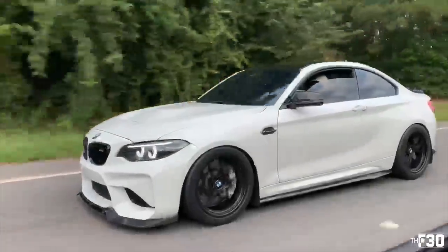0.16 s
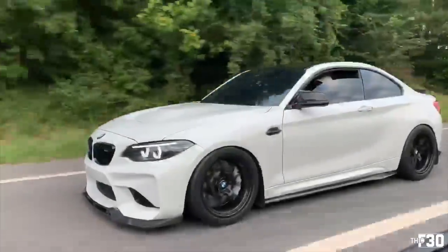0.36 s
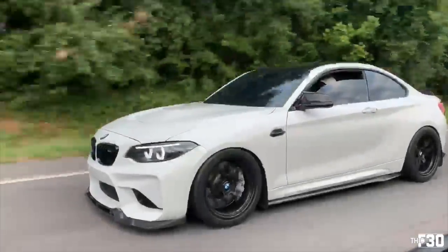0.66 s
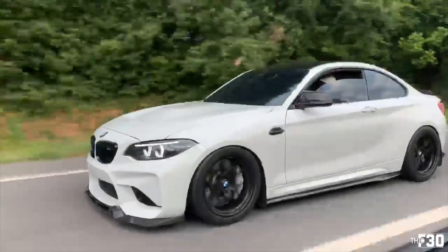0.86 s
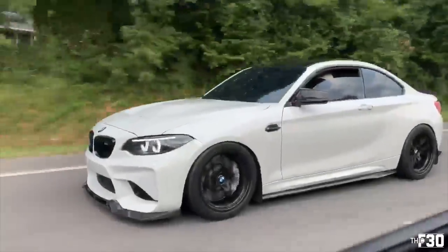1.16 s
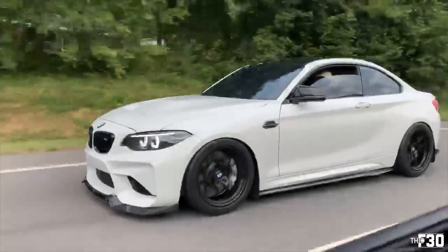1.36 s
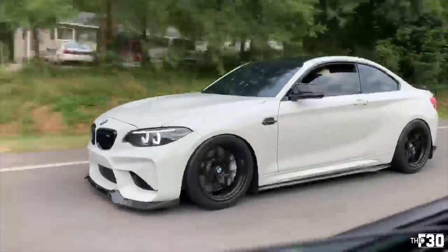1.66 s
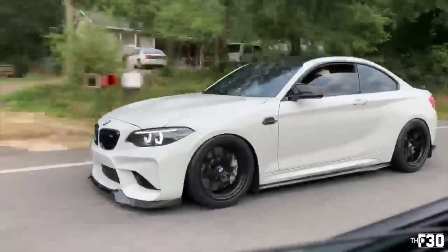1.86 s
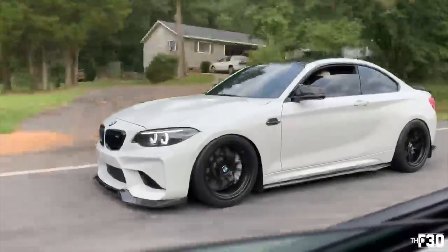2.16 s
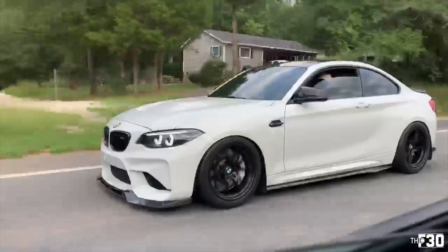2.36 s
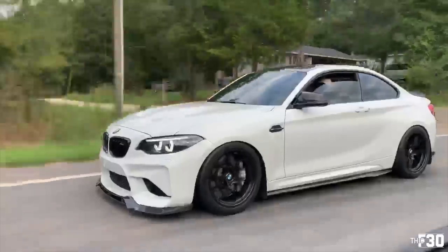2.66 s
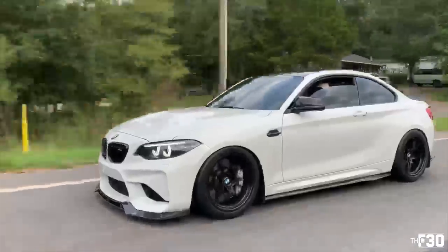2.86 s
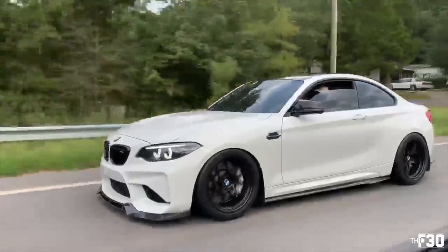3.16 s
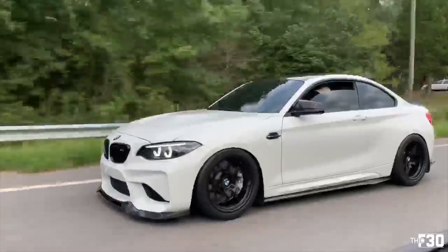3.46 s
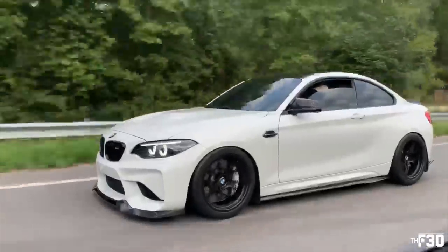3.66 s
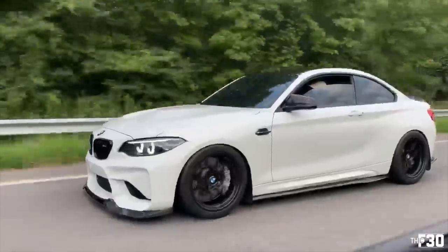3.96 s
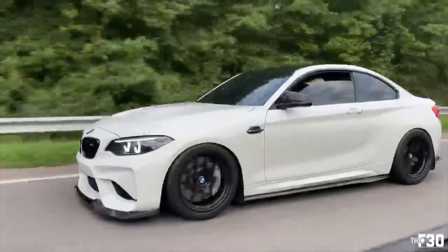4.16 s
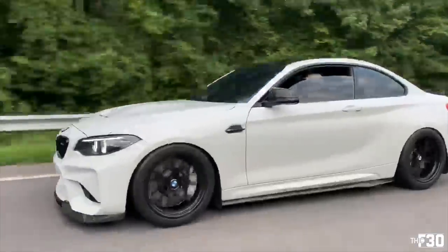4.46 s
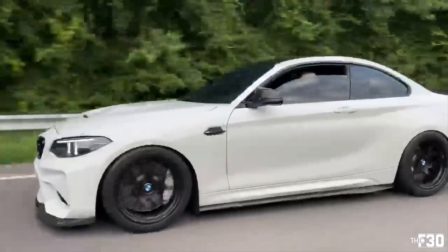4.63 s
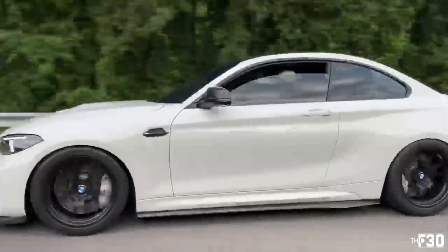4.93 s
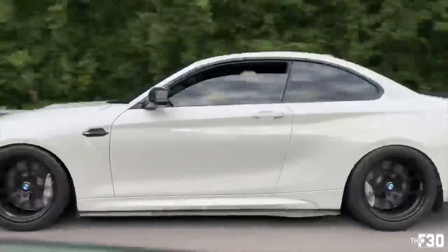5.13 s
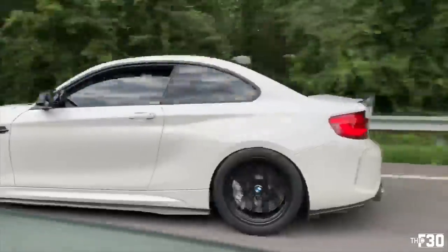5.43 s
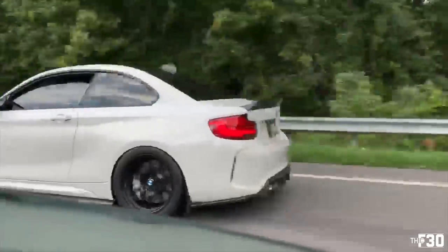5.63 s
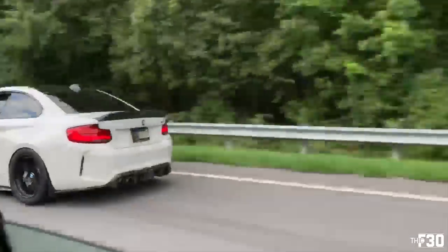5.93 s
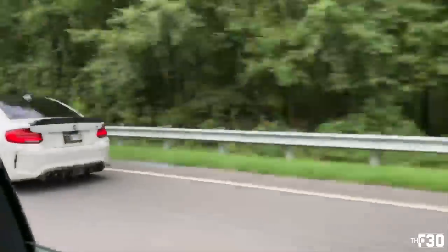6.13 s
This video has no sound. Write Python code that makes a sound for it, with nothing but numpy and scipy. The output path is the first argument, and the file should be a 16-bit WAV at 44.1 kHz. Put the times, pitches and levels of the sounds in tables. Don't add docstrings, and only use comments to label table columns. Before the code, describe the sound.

Inside a car on a tree-lined road, steady tyre roar and low cabin boom surround a small stereo microphone. A turbo coupe alongside pops and burbles irregularly, densest just before three seconds. Then misfires stutter, a thin turbo whistle rises, and the six-cylinder note grows loud and raspy, climbing as the car passes ahead with rushing exhaust gas and hard snaps at the end.

```python
import sys
import numpy as np
from scipy import signal
from scipy.fft import rfft, irfft
from scipy.io import wavfile

SR = 44100
rng = np.random.default_rng(int(sys.argv[2]) if len(sys.argv) > 2 else 0)


def nominal_scale(level):
    x = np.asarray(level, float) / 20
    return 10 ** x


def inscribe(sig):
    pcm = np.round(np.clip(np.atleast_2d(sig).T, -1, 1) * 32767)
    wavfile.write(sys.argv[1], SR, pcm.astype(np.int16))


N = 277509

# start_s, boom_hz, boom_db, buffeting_db
CABIN_BOOM = [
    (0.0, 64.94, -25, -22),
    (1.1, 64.5, -27.5, -19),
    (1.7, 65.17, -21, -22.5),
    (2.4, 64.2, -19, -19.5),
    (4.1, 64.2, -21, -19.5),
    (4.66, 65.6, -28, -14),
    (5.0, 69.15, -21, -24.5),
    (5.6, 70.1, -27.5, -34),
    (6.29, 72.6, -45, -28),
]
# pitch_hz, level_db (per Hz)
BUFFETING_COLOUR = [(11, -31), (18, 9.5), (43, 0), (65, 5.5), (85, -2), (140, -7), (220, -14.5), (290, -14),
                    (480, -120)]
# start_s, level_db
TYRE_ROAR = [
    (0.0, -30),
    (1.6, -29),
    (2.7, -27),
    (4.0, -25),
    (4.2, -25),
]
# pitch_hz, level_db (per Hz)
TYRE_COLOUR = [(76, -25), (130, 2), (181, -12), (236, -14.5), (377, -4), (550, -9.5), (623, -13),
               (813, -10), (966, -2.5), (1280, -13), (1520, -10), (2000, -19.5), (2380, -19), (2750, -30),
               (5500, -46), (7150, -91), (12100, -120)]
# start_s, level_db
WIND_GUSTS = [(0.0, -55.5), (1.1, -58), (1.37, -52.5), (2.26, -55), (2.87, -49.5), (3.35, -52.5),
              (4.2, -48), (4.66, -39), (4.9, -37.5), (5.43, -40.5), (5.83, -33), (6.01, -37), (6.29, -63)]
# pitch_hz, level_db (per Hz)
WIND_COLOUR = [(3500, 8.5), (5000, -7.5), (7000, -1.5), (9000, -17), (11000, 30), (13000, -12),
               (15000, -2.5), (16500, -5.5)]
# pitch_hz, level_db
CRUISE_TONES = [(193, -39), (228, -36), (288, -40), (322, -43), (581, -54), (840, -50), (931, -51),
                (1265, -55)]
# start_s, pitch_hz, start_level_db, swell_db_per_s
PIPE_DRONES = [
    (5.2, 655, -30, 7.5),
    (5.82, 620, -21, -1),
    (5.8, 307, -31, 8),
    (5.3, 722, -30, 0),
    (6.8, 680, -27, -18),
    (5.1, 488, -28, 2.5),
    (6.1, 770, -33, 29),
]
# start_s, pitch_hz, level_db
TURBO_WHISTLE = [
    (4.2, 8300, -58),
    (4.38, 9600, -46),
    (4.52, 11000, -44),
    (4.63, 12400, -43),
    (4.75, 13400, -49),
    (5.05, 14100, -48),
    (5.3, 14300, -68),
]
# start_s, bark_db,
# crack_db (over bark), end_pitch_hz, extra_thud_db
EXHAUST_POPS = [(0.019, -19.5, 4, 140, -1), (0.217, 1.5, -19, 200, -2), (0.552, -2.5, -37, 129, -1),
                (0.734, -18, -21, 210, -0.5), (1.008, -17.5, -6.5, 147, 2.5), (1.127, -6, -18, 130, -2.5),
                (1.289, 1.5, -16, 204, -3.5), (1.515, -25, -19, 152.9, 0), (1.709, -1, -16.5, 121, -2.5),
                (1.845, -8, -4.5, 286, -21), (1.896, -16.5, -13, 172, -1), (1.973, -16, -18, 300, -17),
                (2.217, -23, -28, 171, 3), (2.557, 2, -13, 183, -1), (2.596, -17, -10, 204, -9),
                (2.628, 2, -13, 140, -7), (2.644, -0.5, -17, 217, -4), (2.693, 2.5, -20, 132, 1.5),
                (2.789, -1, -17.5, 176, -0.5), (2.811, -9, -12, 150, 1), (2.851, 2, -14.5, 134, -1),
                (2.881, 0.5, -17, 182, 2), (2.91, -19, -26, 200, 8), (2.961, -3.5, -23, 127, 1),
                (2.992, -10, -12, 220, -17), (3.064, -13, -1, 276, -3), (3.091, -12, -24, 129, -1),
                (3.724, -3, -12.5, 133, 0), (3.797, -7, -26, 134, 1), (3.858, -9.5, -12, 182, -5),
                (3.956, -11.5, -34, 182, -2), (3.985, -9.5, -28, 214, -1.5), (4.022, -10, -15, 104, 6.5),
            (4.103, -10.5, -8, 115, 3.5), (4.234, -20, -5, 132, 8), (4.352, -11.5, -7.5, 127, -3),
            (4.414, -12.5, -3, 128, -6), (4.444, -12, -16, 125, 2), (4.497, -10.5, -9, 117, 2.5),
            (4.517, -5.5, -20, 149, 2.5), (4.544, -11, -11, 215, -3), (4.562, -9, -0.5, 129, 4.5),
            (4.624, -11, 2, 166, -2), (5.39, -9, -8, 186, 1), (5.692, -19, 0, 258, 2),
            (5.834, -9, -25, 155, -2), (5.987, -7.5, -7, 146, 1.5), (6.076, -6, -24, 258, -3)]
# pitch_hz, level_db, t60_s (time to die by 60 dB)
PIPE_MODES = [(215, 2, 0.045), (308.3, 4, 0.085), (429, 1, 0.088), (509.7, -12, 0.14)]
# pitch_hz, level_db, t60_s
MUFFLER_MODES = [(63, -20, 0.16), (102.5, 0, 0.041), (140, -6, 0.022)]
# start_s, level_db, treble_db (over level)
TAILPIPE_CRACKLES = [(0.023, -14, -38), (0.116, -16, -25), (0.217, -12, -11), (0.546, -14, -39),
                     (0.61, -8.5, -43), (0.745, -13.5, -38), (1.124, -8, -36), (1.269, -14, -36),
                     (1.291, -10, -25), (1.32, -15, -30), (1.35, -13, -30), (1.407, -11, -44),
                     (1.84, -14, -31), (1.848, -10, -20), (1.866, -10.5, -40), (1.895, -18, -10),
                     (1.971, -10, -25), (2.223, -10, -32), (2.597, -13, -38), (2.637, -10, -12.5),
                     (2.692, -7.5, -9), (2.698, -5, -13), (2.743, -13, -32), (2.812, -12, -26),
                     (2.861, -5, -11), (2.967, -8, -27), (2.987, -10.5, -42), (3.063, -10, -34),
                     (3.263, -11.5, -37), (3.401, -12, -30.5), (3.976, -9, -34), (4.543, -4, -14),
                     (5.612, -3.5, 0)]
# start_s, level_db
SHIFT_SNAPS = [
    (6.221, -16),
    (6.232, -6),
    (6.26, -18),
    (6.272, -13.5),
    (6.283, -6),
]
# delay_ms, level_db
BODY_ECHOES = [(1.6, -4), (3.7, -7), (5.9, -10), (9.1, -12)]
# start_s, end_s, from_hz, to_hz, level_db
HOWL_GLIDES = [(2.2, 2.56, 190, 194, -29), (2.2, 2.5, 950, 1000, -39), (3.5, 3.73, 192, 192, -30),
               (3.38, 3.74, 880, 860, -37), (4.05, 4.35, 1020, 1080, -35), (4.42, 4.7, 1130, 1050, -30),
               (4.7, 5.3, 900, 950, -29), (4.75, 5.0, 1200, 1190, -28), (4.72, 4.95, 1010, 1000, -29),
               (4.6, 5.0, 1380, 1400, -32), (5.05, 5.3, 1150, 1180, -31), (4.65, 5.2, 1850, 1750, -30),
               (4.55, 5.0, 2120, 2300, -34), (5.15, 5.66, 2290, 2050, -33), (4.9, 5.2, 2750, 2560, -37),
               (5.22, 5.68, 1400, 1500, -23), (5.3, 5.65, 1200, 1250, -29), (5.3, 5.6, 2660, 2680, -37),
               (5.58, 5.72, 4650, 4480, -31), (5.85, 6.35, 1520, 1580, -28), (5.82, 6.04, 2800, 3120, -29),
               (5.75, 6.02, 4700, 5400, -35), (6.0, 6.27, 4960, 4980, -38)]
# start_s, cycles_per_s, load_db
ENGINE_PULL = [
    (3.85, 29.5, -49),
    (4.0, 34, -46.5),
    (4.4, 34.8, -35.5),
    (4.57, 36.6, -31),
    (4.8, 36.9, -28),
    (5.1, 39, -28),
    (5.29, 39.78, -27.5),
    (5.7, 41.5, -30.5),
    (6.29, 44.2, -31),
]
# multiple (of engine
# cycle), level_db
UNEVEN_CYLINDERS = [(5, -18), (7, -19), (15, -10), (16, -6), (17, -9), (24, -7), (30, -10)]
# multiple (whole part sounds), level_db (over load),
# change_db_per_s
BETWEEN_LINES = [(7.96, -12, -2), (9.06, -9, -4), (10.026, 2, 2), (11.04, 0, 5), (12.87, -6, 3),
                 (14, -5, 4), (23.44, -15, -3), (25.8, -21, -10), (31.3, -19, -3)]
# pitch_hz, width_hz, level_db (over load)
EXHAUST_PEAKS = [(216.3, 24.6, 12.5), (235, 31, 8.5), (448, 14, 14), (495, 56, 18), (673, 14.6, 12),
                 (1310, 19, -2.5), (1448, 28, -5)]
# pitch_hz, level_db (per Hz)
RASP_COLOUR = [(150, 8), (250, 0), (400, 5.5), (600, 4.5), (900, -1), (1300, -2), (1800, -10), (2500, -13),
               (3500, -17.5), (5000, -34)]
# pitch_hz, level_db (per Hz)
JET_COLOUR = [(2000, 12.5), (3000, 17), (4500, 11.5), (6000, 6), (8000, 10), (11000, 12), (14000, -70),
              (16500, -48)]
# start_s, level_db
JET_LEVEL = [
    (4.77, -59),
    (5.13, -32.5),
    (5.6, -25),
    (5.91, -24),
    (6.11, -25.5),
    (6.29, -27),
]
# start_s, delay_ms
GROUND_ECHO_DELAY = [
    (4.4, 2.2),
    (4.7, 2.17),
    (5.15, 2.26),
    (5.45, 2.07),
    (5.8, 2.05),
    (6.05, 1.94),
    (6.29, 1.92),
]

GROUND_SHARE = 0.65
ABREAST_S = 5


def rms_one(x):
    return x / np.sqrt(np.mean(x ** 2) + 1e-20)


def in_time(rows):
    s, *columns = np.transpose(rows)
    return [np.interp(np.arange(N) / SR, s, column) for column in columns]


def fade(rows, rise_s):
    return np.clip((np.arange(N) / SR - rows[0][0]) / rise_s, 0, 1)


def drift(rate_hz):
    r = np.exp(-80 * np.pi * rate_hz / SR)
    white = rng.standard_normal(N // 40 + 2002)
    slow = signal.lfilter([1], [1, -2 * r, r * r], white)[2000:]
    return np.interp(np.arange(N) / 40, np.arange(len(slow)), rms_one(slow))


def tone(hz, level_db, flutter_db, wobble_rad):
    turns = np.cumsum(hz + np.zeros(N)) / SR + rng.random()
    phase = 2 * np.pi * turns + wobble_rad * drift(6.7)
    return np.sqrt(2) * nominal_scale(level_db + flutter_db * drift(9.2)) * np.sin(phase)


def band(x, low_hz, high_hz):
    return signal.sosfilt(signal.butter(2, [low_hz, high_hz], "band", fs=SR, output="sos"), x + 1e-18)


def noise(colour, patchy_db, alike):
    hz, level_db = np.transpose(colour)
    edges = hz[0] * 2 ** np.arange(0, np.log2(hz[-1] / hz[0]) + 1 / 3, 1 / 3)
    together = drift(25) + 0.15 * drift(2.4)
    white = rng.standard_normal((2, 2, N))
    out = 0
    for k, (low, high) in enumerate(zip(edges, np.minimum(edges[1:], .45 * SR))):
        band_db = np.interp(np.log(low * high) / 2, np.log(hz), level_db)
        flicker_db = patchy_db * (0.87 * together + drift(13.0))
        out = out + nominal_scale(band_db + flicker_db) * band(white[k % 2], low, high)
    mid, side = out
    alike = np.clip(alike, 0, 1)
    return rms_one(np.sqrt(1 + alike) * mid + np.sqrt(1 - alike) * side * [[1], [-1]])


def ring(drive, modes):
    out = 0
    for hz, level_db, t60_s in modes:
        r, w = nominal_scale(-60 / (t60_s * SR)), 2 * np.pi * hz / SR
        out = out + signal.lfilter([0, nominal_scale(level_db) * np.sin(w)], [1, -2 * r * np.cos(w), r * r], drive + 1e-18)
    return out


def bursts(seconds, levels_db, decay_ms, attack_ms=1.4):
    out, t_ms = np.zeros(N + 4000), np.arange(4000) / SR * 1000
    puff = np.minimum(t_ms / attack_ms, 1) * np.exp(-t_ms / decay_ms)
    for s, db in zip(seconds, levels_db):
        at = int(s * SR)
        out[at:at + 4000] += nominal_scale(db) * puff
    return out[:N] * rng.standard_normal(N)


def spread(x):
    side = 0
    for k, (ms, db) in enumerate(BODY_ECHOES):
        side = side + nominal_scale(db) * (-1) ** k * np.pad(x, (int(ms * SR / 1000), 0))[:N]
    return x + nominal_scale(-13.5) * side * [[-1], [1]]


def with_echo(x, lag_ms, share):
    late = np.arange(N) - lag_ms * SR / 1000
    copy = np.array([np.interp(late, np.arange(N), port) for port in x])
    return (x + share * copy) / np.sqrt(1 + share ** 2)


def road():
    boom_hz, boom_db, buffeting_db = in_time(CABIN_BOOM)
    (tyre_db,), (wind_db,) = in_time(TYRE_ROAR), in_time(WIND_GUSTS)
    boom = tone(boom_hz, boom_db + 2.5, 1.0, 0.71)
    buffeting = nominal_scale(buffeting_db + 2.5) * noise(BUFFETING_COLOUR, patchy_db=0.5, alike=1)
    tyres = noise(TYRE_COLOUR, patchy_db=1.1, alike=.15)
    bounce_ms = 4.0 + 0.35 * drift(.8)
    tyres = with_echo(tyres, bounce_ms, share=0.35)
    tyres = tyres + band(tyres, 800, 2000) * [[.22], [-.22]]
    wind = nominal_scale(wind_db + 5) * noise(WIND_COLOUR, patchy_db=.5, alike=.2)
    return boom + buffeting + nominal_scale(tyre_db - 1) * tyres + wind


def steady_tones():
    cruise = sum(tone(hz, db, 3.0, hz / 600) for hz, db in CRUISE_TONES)
    out = (1 - fade(ENGINE_PULL, .5)) * cruise
    for row in PIPE_DRONES:
        start, hz, start_db, swell_db = row
        since = np.arange(N) / SR - start
        drone_hz = hz * (1 + 0.025 * since)
        drone_db = start_db + swell_db * since + 1.5 * drift(25)
        out += fade([row], .03) * tone(drone_hz, drone_db, 1.5, .3)
    return out + fade(TURBO_WHISTLE, .05) * tone(*in_time(TURBO_WHISTLE), 2.0, 3.0)


def pops():
    drop_hz, drop_s, second_bang_ms = 517, 0.00451, 8.425
    s, bark_db, crack_db, end_hz, extra_thud_db = np.transpose(EXHAUST_POPS)
    chance = rng.random((len(s), 2))
    bark, thud, t = np.zeros(N + 4000), np.zeros(N), np.arange(2000) / SR
    swell = (1 - np.exp(-t / 0.0072)) * np.exp(-t / 0.0062)
    for k in range(len(s)):
        hz = end_hz[k] + drop_hz * np.exp(-t / drop_s)
        bang = swell * np.sin(2 * np.pi * (np.cumsum(hz) / SR + chance[k, 0]))
        for lag_ms, db in ((0, 2.5), (second_bang_ms, -3.0 + 4 * chance[k, 1])):
            at = int((s[k] + lag_ms / 1000) * SR)
            bark[at:at + 2000] += nominal_scale(bark_db[k] + db) * bang
    bark = bark[:N]
    thud_db = 2.5 + extra_thud_db + 0.57 * bark_db - 6.5 * (s > 5.5)
    thud[((s + 0.005) * SR).astype(int)] = nominal_scale(thud_db)
    soft_thud = signal.lfilter([.03], [1, -.97], thud)
    crack = band(band(bursts(s, bark_db + crack_db + 5, 15.0), 550, 1880), 410, 2720)
    grit = band(band(bursts(s, bark_db + 2.0, 13.5), 144, 670), 106, 1000)
    return bark + nominal_scale(-43) * ring(bark, PIPE_MODES) + ring(soft_thud, MUFFLER_MODES) + crack + grit


def crackles():
    decay_ms, shift_treble_db = 4.58, 4.5
    snaps = [(s, db, shift_treble_db) for s, db in SHIFT_SNAPS]
    s, level_db, treble_db = np.transpose(TAILPIPE_CRACKLES + snaps)
    body = band(band(bursts(s, level_db + 3.5, decay_ms, 0.78), 630, 1570), 550, 2600)
    edge = band(bursts(s, level_db + treble_db + 1.5, 0.22 * decay_ms, 0.67), 2300, 13300)
    return body + edge


def howls(firing):
    sharpness = 36
    line_share = 0.7
    out, t = np.zeros((2, N)), np.arange(N) / SR
    for start, end, from_hz, to_hz, db in HOWL_GLIDES:
        width_hz = from_hz / sharpness
        span = slice(int(start * SR), int(end * SR))
        share = (t[span] - start) / (end - start)
        turn = np.exp(2j * np.pi * np.cumsum(from_hz + (to_hz - from_hz) * share) / SR)
        mid, side = (((drift(0.9 * width_hz) + 1j * drift(0.82 * width_hz))[span] * turn).real for _ in range(2))
        if ENGINE_PULL[0][0] < start and from_hz < 2900:
            low_pass = signal.butter(2, .9 * width_hz, fs=SR)
            caught = signal.lfilter(*low_pass, firing[span] / turn) * turn
            mid = np.sqrt(line_share) * rms_one(caught.real) + np.sqrt(1 - line_share) * mid
            side = np.sqrt(line_share) * rms_one(caught.imag) + np.sqrt(1 - line_share) * side
        swell = np.sqrt(np.abs(np.sin(np.pi * share)))
        out[:, span] += nominal_scale(db) * swell * (mid + .7 * side * [[1], [-1]])
    return out


def uneven_firing(cycles):
    multiple = np.arange(72)
    level_db = -12 - 5.5 * np.log2((multiple + 1) / 20) + 3 * rng.standard_normal(72)
    level_db += 5 * (multiple % 6 == 0)
    level_db[:19] = -120
    level_db[19:23] -= 8
    for k, db in UNEVEN_CYLINDERS:
        level_db[k] = db
    partials = nominal_scale(level_db) * np.exp(2j * np.pi * rng.random(72))
    out = 0
    for group in range(6):
        wave = irfft(partials * (multiple % 7 % 6 == group), 2048) * 1024 * np.sqrt(2)
        place = (cycles + .0012 * drift(8)) % 1 * 2048
        out = out + nominal_scale(3 * drift(6)) * np.interp(place, np.arange(2049), np.append(wave, wave[0]))
    return out


def through_exhaust(hz):
    branch_hz, branch_width_hz = 232, 11
    peaks = sum(nominal_scale(db) / (1 + 2j * (hz - top_hz) / width_hz) for top_hz, width_hz, db in EXHAUST_PEAKS)
    off = (hz - branch_hz) / branch_width_hz
    return 20 * np.log10(np.abs(peaks) * (.05 + off ** 2) / (.5 + off ** 2) + 1e-6)


def firing_note(cycle_hz, load_db):
    t = np.arange(N) / SR
    valve_opens_s, valve_rise_s, valve_shut_db = 4.62, 0.16, -12.5
    note_db = load_db + valve_shut_db * np.clip(1 - (t - valve_opens_s) / valve_rise_s, 0, 1)
    lift_db = -150 * np.clip(t - 6.04, 0, .08)
    note = 0
    for k in (6, 12, 18, 36):
        level_db = note_db + lift_db * (k in (12, 18)) + through_exhaust(k * cycle_hz)
        note = note + tone(k * cycle_hz, level_db, 1.0, .15)
    for k, db, change_db in BETWEEN_LINES:
        level_db = note_db + lift_db / 2 + db + change_db * (t - ABREAST_S)
        note = note + tone(int(k) * cycle_hz, level_db, 1.7, .15)
    note = spread(note)
    lag_s = 0.31 / 1000
    note[1] = np.interp(t - lag_s, t, note[1])
    return note


def exhaust_hiss(cycles, load_db):
    jet_db, = in_time(JET_LEVEL)
    full_load_db = -28
    rasp_db = -21.5 + 0.69 * (load_db - full_load_db)
    rasp = nominal_scale(rasp_db) * noise(RASP_COLOUR, patchy_db=4.0, alike=0.14)
    jet = nominal_scale(jet_db) * noise(JET_COLOUR, patchy_db=2.0, alike=0.057)
    puff = 1 + 0.029 * np.sin(12 * np.pi * cycles)
    return puff * with_echo(rasp + jet, *in_time(GROUND_ECHO_DELAY), GROUND_SHARE)


def engine():
    cycle_hz, load_db = in_time(ENGINE_PULL)
    cycles = np.cumsum(cycle_hz) / SR
    pan_db = np.clip(-2.5 * (np.arange(N) / SR - ABREAST_S), -9.5, 9.5)
    pan = nominal_scale(pan_db * [[.5], [-.5]])
    firing = uneven_firing(cycles)
    uneven = with_echo(spread(nominal_scale(load_db - 0.5) * firing), *in_time(GROUND_ECHO_DELAY), GROUND_SHARE)
    lines = (firing_note(cycle_hz, load_db) + uneven) * nominal_scale([[0.3], [-0.3]])
    hiss = exhaust_hiss(cycles, load_db) * pan
    return fade(ENGINE_PULL, 0.26) * (lines + hiss) + howls(firing) * pan


def scene():
    return road() + spread(steady_tones() + pops() + crackles()) + engine()


def band_limit(x):
    return signal.sosfilt(signal.butter(12, 16960, fs=SR, output="sos"), x)


def record(dry):
    low_cut_hz, top_hz, side_cut_hz, side_lift_hz = 34, 15900, 340, 1600
    treble_hz, port_zero_hz, port_turn_hz = 5900, 11050, 4620
    hz = np.arange(N // 2 + 1) * SR / N + 1
    rounded = 1.017 * np.tanh(dry / 1.333)
    left, right = rfft(rounded) * (hz < top_hz) / np.sqrt(1 + (low_cut_hz / hz) ** 10)
    mid = (left + right) / 2
    side = (left - right) / 2 / np.sqrt(1 + (side_cut_hz / hz) ** 10)
    side = side * (1 + .4 / (1 + (side_lift_hz / hz) ** 4))
    treble = 1 / (1 + (treble_hz / hz) ** 16)
    angle = np.pi * (hz - port_zero_hz) / port_turn_hz
    turn = np.exp(1j * (angle - .15 * np.sin(4 * angle)))
    lower = np.array([mid + side, mid - side])
    upper = np.array([left / turn, (left + 0.69 * right) * turn / 1.24])
    ports = np.sqrt(1 - treble) * lower - np.sqrt(treble) * upper
    return band_limit(irfft(ports, N))


dry = scene()
out = record(dry)
inscribe(out)
```